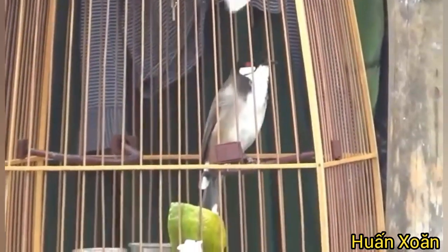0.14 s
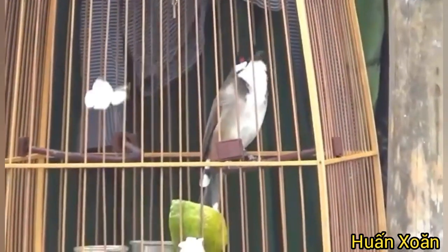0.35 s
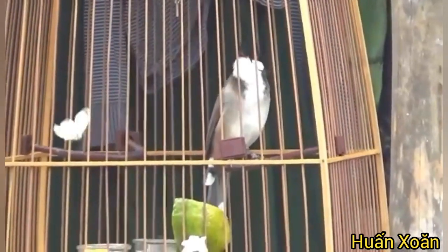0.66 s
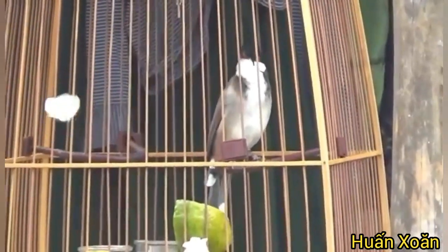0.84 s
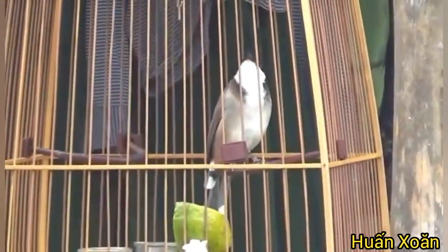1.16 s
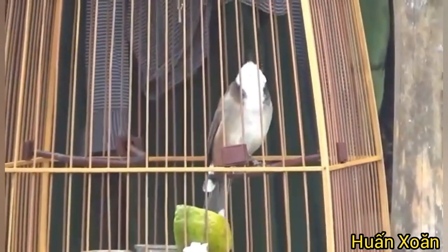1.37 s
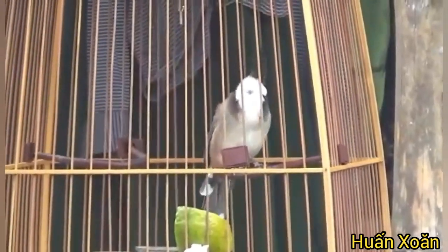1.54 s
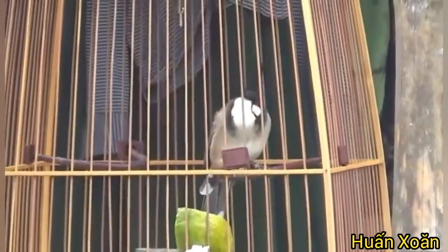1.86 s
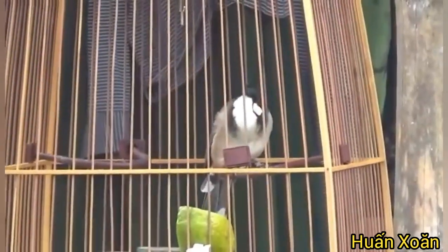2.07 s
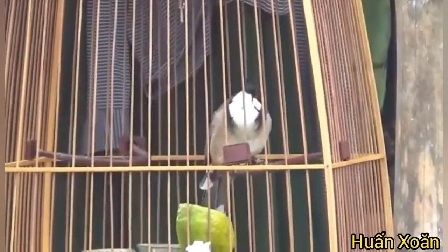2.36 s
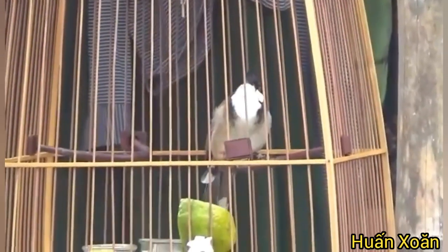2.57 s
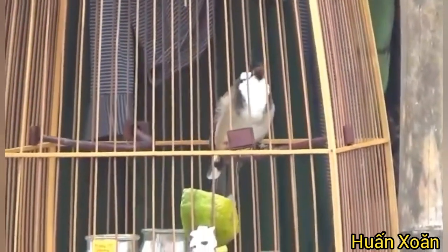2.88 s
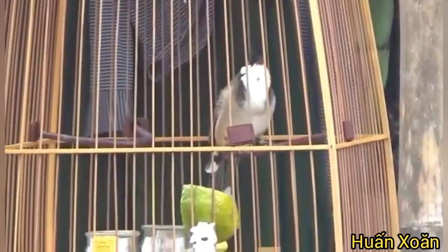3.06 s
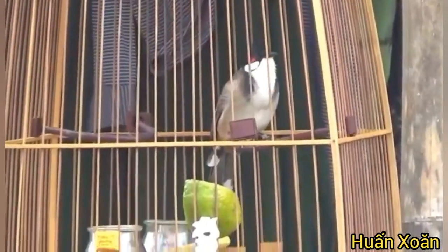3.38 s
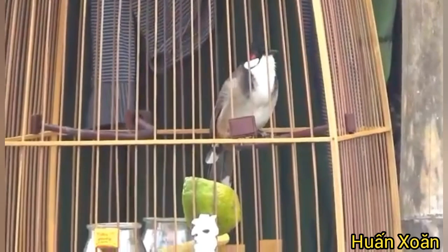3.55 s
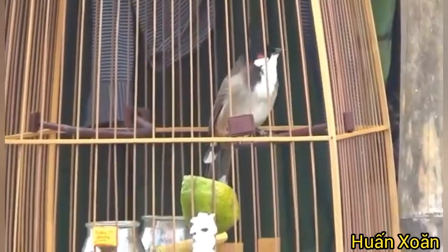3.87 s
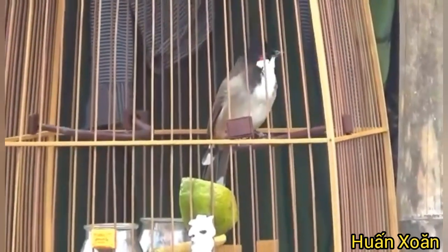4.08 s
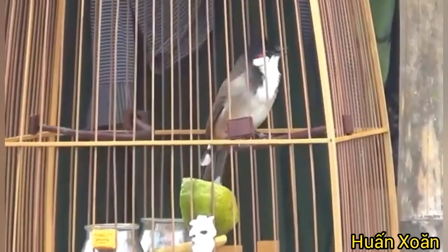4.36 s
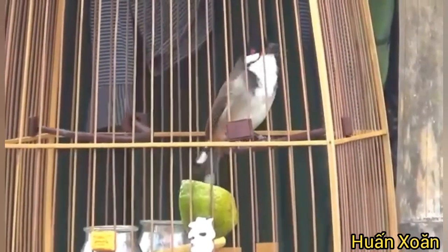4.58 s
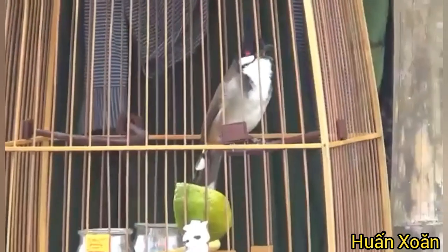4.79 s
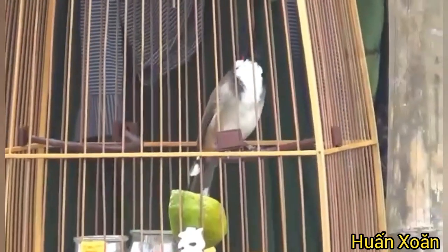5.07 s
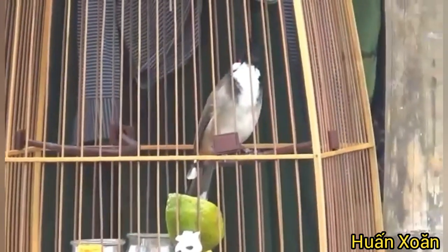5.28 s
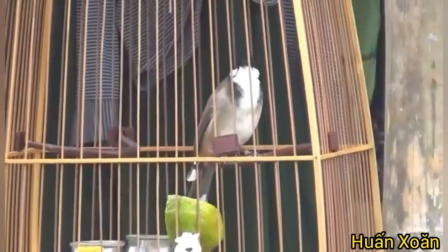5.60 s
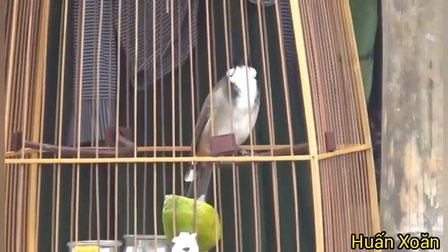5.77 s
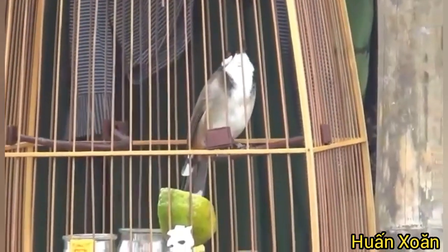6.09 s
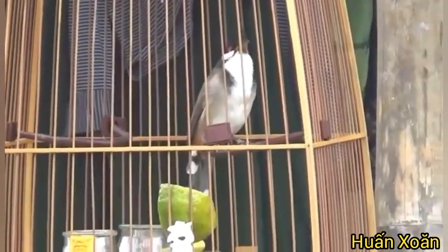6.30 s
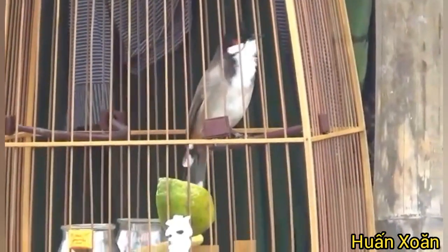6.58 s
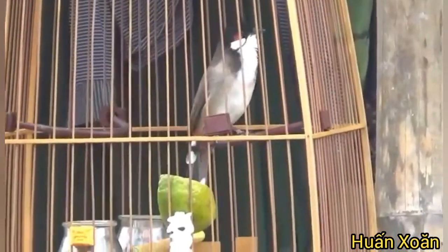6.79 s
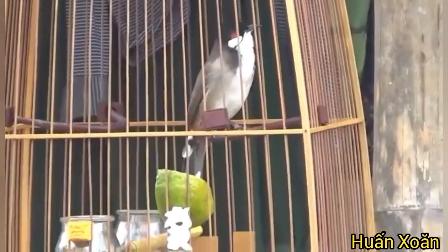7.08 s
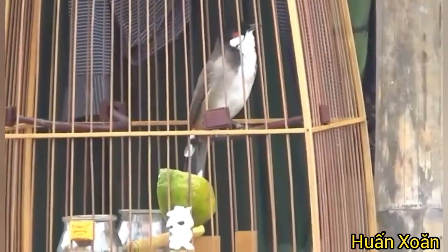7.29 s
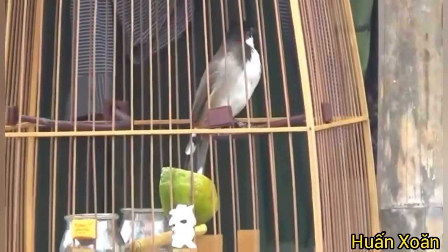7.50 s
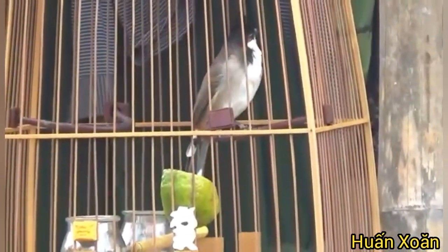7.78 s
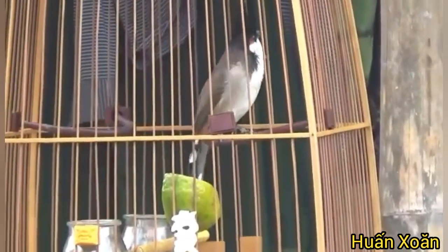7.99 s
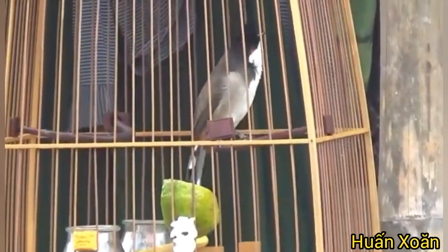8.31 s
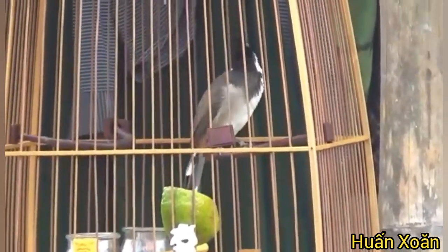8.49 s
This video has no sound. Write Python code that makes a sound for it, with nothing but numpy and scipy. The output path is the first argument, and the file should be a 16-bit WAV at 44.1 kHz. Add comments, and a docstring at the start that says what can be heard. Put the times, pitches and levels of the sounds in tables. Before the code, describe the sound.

A caged bird repeats quick, chattering whistled phrases in a quiet yard, while another bird chirps farther off.

```python
"""A caged bulbul sings six short phrases in a yard: rising whips, harsh buzzes, runs of gliding whistles.
Its syrinx gives a near sine, roughened by fast trills; the beak colours the overtones, and their
strength follows the turning head. Walls throw the notes back. Farther off a second bird chirps,
an insect buzzes in swells, and an engine hums for a while over low rumble and quiet outdoor air."""
import sys
import numpy as np
from scipy import signal
from scipy.fft import rfft, irfft, next_fast_len
from scipy.io import wavfile

SR = 44100
rng = np.random.default_rng(int(sys.argv[2]) if len(sys.argv) > 2 else 0)


def file_out(sig):
    """Save sig as 16-bit WAV at sys.argv[1]."""
    # one column per channel
    cols = np.atleast_2d(sig).T
    # limit, then scale
    lim = np.clip(cols, -1, 1)
    pcm = np.round(lim * 32767).astype(np.int16)
    wavfile.write(sys.argv[1], SR, pcm)


N = 381465
TIME_S = np.arange(N) / SR


def gain_of(db):
    """Decibels to gain."""
    return 10 ** (np.asarray(db) / 20)


def gain_curve(points):
    """Gain over the scene from (t/s, level/dB) points."""
    return gain_of(np.interp(TIME_S, *np.transpose(points)))


def unit_rms(x):
    """Scales to rms 1."""
    return x / np.sqrt(np.mean(x ** 2) + 1e-20)


def at_hz(points, hz):
    """Table lookup on a log-frequency axis."""
    table_hz, value = np.transpose(points)
    return np.interp(np.log(hz + 1), np.log(table_hz + 1), value)


def add(mix, start_s, sound):
    """Mixes a sound in at start_s."""
    at = round(start_s * SR)
    sound = sound[max(-at, 0):]
    part = mix[max(at, 0):][:len(sound)]
    part += sound[:len(part)]


def wander(size, rate_hz):
    """Smooth random drift, rms about 1."""
    padded = next_fast_len(size + SR // 2)
    hz = np.fft.rfftfreq(padded, 1 / SR)
    spectrum = rfft(rng.standard_normal(padded)) * np.exp(-(hz / rate_hz) ** 2)
    return unit_rms(irfft(spectrum, padded))[:size]


def fade(size, edge_s=0.002):
    """Window with cosine ends."""
    return signal.windows.tukey(size, min(1, 2 * edge_s * SR / size))


# air spectrum: f/Hz, relative density/dB
AIR_SPECTRUM_DB = [(15, -33), (30, -33), (90, -3.5), (200, -6), (330, -6.5), (600, -8.5), (850, -8),
                   (1250, -12), (1850, -13), (3700, -17.5), (6400, -20.5), (9400, -20), (11000, -25)]
# air loudness: t/s, level/dB
AIR_LEVEL_DB = [(0, -62.5), (1.5, -60.5), (2.3, -61), (4.5, -61.5), (6, -62), (8.65, -62)]
# likeness of left and right: f/Hz, correlation
AIR_CORRELATION = [(50, 0.92), (120, 0.94), (250, 0.67), (500, 0.23), (1000, 0.021), (3000, 0.21),
                   (10000, 0.77)]

def air():
    """Soft outdoor noise, centred in the bass, widest near 1 kHz."""
    hz = np.fft.rfftfreq(N, 1 / SR)
    left, independent = rfft(rng.standard_normal((2, N)))
    correlation = at_hz(AIR_CORRELATION, hz)
    right = correlation * left + np.sqrt(1 - correlation ** 2) * independent
    spectra = np.array([left, right]) * gain_of(at_hz(AIR_SPECTRUM_DB, hz))
    return unit_rms(irfft(spectra, N)) * gain_curve(AIR_LEVEL_DB)


# deep outdoor rumble: t/s, level/dB
RUMBLE_LEVEL_DB = [(0, -77), (.6, -64.5), (1.1, -75), (2, -73), (2.8, -76), (3.7, -79), (4.9, -71.5),
                   (5.3, -68.5), (6, -76), (7.2, -82), (8.65, -83)]
# faint hum: t/s, level/dB
HUM_LEVEL_DB = [(0, -74), (1.2, -83), (1.55, -67.5), (1.899, -85), (2.6, -84), (3, -71.5), (3.4, -94),
                (4.15, -88), (4.4, -70.5), (4.75, -71), (5, -87), (8.65, -98)]

def rumble(centre_hz=53, width_hz=16, hum_hz=135.4, hum_drift_hz=5):
    """Narrow-band rumble and a wavering hum; both come and go."""
    deep = wander(N, width_hz) * np.sin(2 * np.pi * centre_hz * TIME_S)
    hum = np.sin(2 * np.pi * np.cumsum(hum_hz + hum_drift_hz * wander(N, 12.55)) / SR)
    return unit_rms(deep) * gain_curve(RUMBLE_LEVEL_DB) + unit_rms(hum) * gain_curve(HUM_LEVEL_DB)


# engine loudness: t/s, level/dB
ENGINE_LEVEL_DB = [(0, -71), (.4, -68), (.8, -63), (1.55, -61.5), (1.95, -72.5), (2.4, -81), (3, -72),
                   (3.8, -78), (5.5, -77), (8.65, -95)]
# base rate and its orders: multiple, relative level/dB
ENGINE_HZ, ORDERS_DB = 28.5, [(2, -7.5), (3, 1.5), (4, -24), (5, -9), (6, -14)]

def engine(drift=0.015, flutter_db=4.5):
    """Low orders of a distant engine, each wavering in strength."""
    phase = 2 * np.pi * np.cumsum(ENGINE_HZ * (1 + drift * wander(N, 4.4))) / SR
    hum = sum(gain_of(db + flutter_db * wander(N, 14)) * np.sin(k * phase) for k, db in ORDERS_DB)
    return unit_rms(hum) * gain_curve(ENGINE_LEVEL_DB)


# yard decay: f/Hz, T60/s
YARD_T60_S = [(1500, 0.61), (3500, 0.43), (7000, 0.2), (11000, 0.27)]

def yard(x, crossfeed=0.43, build_s=0.0066):
    """Diffuse tail from walls and eaves; builds after the direct sound, treble dies first."""
    noise = rng.standard_normal((2, SR))
    hz, t, spectra = signal.stft(noise + crossfeed * noise[::-1], SR, nperseg=256)
    decay = gain_of(-60 * t / at_hz(YARD_T60_S, hz)[:, None])
    build = 1 - np.exp(-(t / build_s) ** 2)
    tail = signal.istft(spectra * decay * build, SR, nperseg=256)[1]
    return signal.fftconvolve(x[None], tail / np.linalg.norm(tail[0]), axes=1)[:, :N]


# reflections: delay/s, left gain, right gain
NEAR_ECHOES = [(.0023, 0.19, 0.3), (.0061, -0.27, -0.21), (0.0135, 0.29, 0.25), (0.025, .07, .05),
               (.041, 0.036, 0.042)]

def near_echoes(x):
    """Direct sound plus single reflections from close surfaces."""
    out = np.array([x, x])
    for delay_s, left, right in NEAR_ECHOES:
        add(out[0], delay_s, left * x)
        add(out[1], delay_s, right * x)
    return out


# buzz swells: start/s, end/s, final level/dB
INSECT_SWELLS = [(0.157, 0.856, -67.5), (1.954, 2.318, -66), (3.497, 3.95, -68.5), (5.1, 5.55, -68.5),
                 (6.5, 7.055, -67.5), (8.15, 8.543, -69)]

def insect(centre_hz=7150, spread_hz=170, rise_db=12, stroke_hz=130):
    """Regular strokes ring a narrow, unsteady tone; each swell stops short."""
    envelope = np.zeros(N)
    for start_s, end_s, db in INSECT_SWELLS:
        remaining = np.linspace(1, 0, round((end_s - start_s) * SR))
        swell = gain_of(db - rise_db * remaining ** 2)
        add(envelope, start_s, swell * fade(len(swell), edge_s=0.01))
    tone = np.sin(2 * np.pi * np.cumsum(centre_hz + spread_hz * wander(N, 295)) / SR)
    strokes = 1 + np.sin(2 * np.pi * stroke_hz * TIME_S)
    return envelope * unit_rms(tone * strokes)


# open-beak response: f/Hz, gain/dB
BEAK_GAIN_DB = [(4500, -6.5), (6000, -24.5), (7200, -9), (8200, -32), (9000, -5.5), (9700, -10),
                (10500, -1), (11500, 0.5)]

def syrinx(hz, db, loud_db=-28):
    """Near sine; overtones, chiefly the third, grow with effort and are coloured by the beak."""
    phase = 2 * np.pi * np.cumsum(hz) / SR
    effort_db = np.minimum(db - loud_db, 2)
    second = gain_of(-22 + 0.043 * effort_db + at_hz(BEAK_GAIN_DB, 2 * hz)) * np.sin(2 * phase)
    third = gain_of(-10 + 0.61 * effort_db + at_hz(BEAK_GAIN_DB, 3 * hz)) * np.sin(3 * phase)
    return np.sqrt(2) * gain_of(db) * (np.sin(phase) + second + third) * fade(len(hz))


# far bird's calls: t/s, level/dB, f/Hz
FAR_CHIRPS = [(-.09, -46, 3860), (0.77, -46.5, 3770), (1.808, -45.5, 3664), (2.444, -46.5, 3660),
              (3.341, -46, 3810), (4.079, -48.5, 3910), (4.83, -50, 3810), (5.538, -49.5, 3890),
              (6.45, -51.5, 3880), (6.723, -48.5, 3956), (7.549, -50, 3950), (8.303, -48, 3720)]
# one chirp: t/s, pitch ratio, relative level/dB
CHIRP_CONTOUR = [(0, .895, -6), (.015, .95, -1.5), (.04, 1, 0), (.07, 1.015, -1), (.095, 1.005, -12)]

def far_bird(jitter=0.0337):
    """Repeated rising chirp, hoarse from fast pitch jitter."""
    out = np.zeros(N)
    knots_s, glide, contour_db = np.transpose(CHIRP_CONTOUR)
    t = np.arange(0, knots_s[-1], 1 / SR)
    for start_s, db, hz in FAR_CHIRPS:
        pitch_hz = hz * np.interp(t, knots_s, glide) * (1 + jitter * wander(len(t), 460))
        add(out, start_s, syrinx(pitch_hz, db + np.interp(t, knots_s, contour_db)))
    return out


def rasp(db, highpass_hz=4300, beak_share=0.05):
    """Turbulent hiss leaving the beak with a rough note."""
    size = len(db)
    hz = np.fft.rfftfreq(size, 1 / SR)
    colour = gain_of(at_hz(BEAK_GAIN_DB, hz) * beak_share) / (1 + (highpass_hz / (hz + 1)) ** 4)
    hiss = irfft(rfft(rng.standard_normal(size)) * colour, size)
    return gain_of(db) * unit_rms(hiss) * fade(size)


def flick(from_hz, to_hz, db, length_s=0.01177, jitter=0.088, shimmer_db=3, rasp_db=-19):
    """Unsteady upward sweep as the voice catches."""
    u = np.linspace(0, 1, round(length_s * SR))
    hz = (from_hz + (to_hz - from_hz) * u) * (1 + jitter * wander(len(u), 1030))
    level_db = db - 7 - 28 * (u - .75) ** 2 + shimmer_db * wander(len(u), 910)
    return syrinx(hz, level_db) + rasp(level_db + rasp_db)


def crest_db(u, top, rise_db, fall_db):
    """Level over a note (u = 0..1): swells to 0 dB at u = top, then falls."""
    return -np.where(u < top, rise_db * (1 - u / top) ** 2, fall_db * ((u - top) / (1 - top)) ** 2)


def voice(hz, db, trill, trill_hz=185.1, swing_hz=303, throb_db=2, shimmer_db=0.5, rasp_db=-21):
    """Sung tone; in a trill the pitch jumps up and slides down, loudest on the way down."""
    size, trill = len(hz), np.clip(trill, 0, 1)
    cycle = 2 * np.pi * np.cumsum(trill_hz * (1 + 0.044 * wander(size, 60))) / SR
    hz = hz + trill * swing_hz * (np.sin(cycle) + 0.18 * np.sin(2 * cycle))
    jitter = .002 + .015 * trill
    hz = hz * (1 + jitter * wander(size, 450))
    db = db + trill * (throb_db * np.sin(cycle - 1) - 5) + shimmer_db * wander(size, 170)
    return syrinx(hz, db) + trill * rasp(db + rasp_db)


def whip(length_s, from_hz, to_hz, db, trill, jitter=0.02, shimmer_db=3, flutter_hz=254):
    """Rough upward sweep that levels off and thins out near its top."""
    u = np.linspace(0, 1, round(length_s * SR))
    sweep_hz = to_hz + (from_hz - to_hz) * (1 - u) ** 1.7
    hz = sweep_hz * (1 + jitter * wander(len(u), flutter_hz))
    level_db = db + crest_db(u, top=0.38, rise_db=8, fall_db=24)
    return voice(hz, level_db + shimmer_db * wander(len(u), flutter_hz), trill)


def buzz(length_s, hz, db, trill, scoop_hz=498, scoop_s=0.0082, catch_s=0.013):
    """Deep trill that scoops up to a steady pitch, swells and stops short."""
    t = np.arange(0, length_s, 1 / SR)
    pitch_hz = hz - scoop_hz * np.exp(-t / scoop_s)
    level_db = db + crest_db(t / length_s, top=0.64, rise_db=4.5, fall_db=2.5)
    catch = 0.67 * np.exp(-t / catch_s)
    return voice(pitch_hz, level_db, trill + catch)


def whistle(length_s, from_hz, to_hz, db, swell_db, trill, arch_db=4.5, settle_s=0.0032, catch_s=0.0036):
    """Lands from above with a brief trill, then glides evenly under an arch of loudness."""
    t = np.arange(0, length_s, 1 / SR)
    u = t / length_s
    overshoot = 0.041 * np.exp(-t / settle_s)
    hz = (from_hz + (to_hz - from_hz) * u) * (1 + overshoot)
    level_db = db + swell_db * (u - .5) - arch_db * ((2 * u - 1) ** 2 - .25)
    catch = 0.31 * np.exp(-t / catch_s)
    return voice(hz, level_db, trill + catch)


# treble as the head turns: t/s, gain/dB
FACING_GAIN_DB = [(.5, 1.5), (1.3, -1), (2.55, 2), (2.8, 5), (4.5, 3), (5, 1), (6.1, 2.5), (6.5, 6.5),
                  (8, 1)]

def turning_head(song, split_hz=5200):
    """Overtones beam forward, so their strength changes as the bird looks about."""
    highpass = signal.butter(4, split_hz, btype="high", fs=SR, output="sos")
    treble = signal.sosfiltfilt(highpass, song)
    return song + treble * (gain_curve(FACING_GAIN_DB) - 1)


# rising whips: t/s, length/s, from f/Hz, to f/Hz, level/dB, trill depth
WHIP_NOTES = [(0.393, 0.043, 3090, 4390, -35.5, 0.63), (6.067, 0.042, 3050, 4480, -35, 0.32),
              (6.247, .049, 2462, 3970, -32.5, 0.35), (7.968, 0.056, 3220, 4250, -39, 0.44)]
# paired buzzes: t/s, length/s, f/Hz, level/dB, trill depth
BUZZ_NOTES = [(2.496, 0.054, 3328, -30.5, 0.65), (2.717, 0.058, 3350, -27.5, 0.66),
              (4.489, 0.055, 3477, -30.5, 0.47), (4.684, 0.064, 3426, -27, 0.57)]
# two flicks before each whip and buzz: lead/s, from f/Hz, to f/Hz, level/dB
LEAD_FLICKS = [(.0175, 2380, 3650, -42.5), (0.0083, 1700, 3450, -42)]
# whistles: t/s, length/s, from f/Hz, to f/Hz, level/dB, start-to-end swell/dB, trill depth
WHISTLE_NOTES = [ (0.602, 0.026, 3680, 3600, -42, 19, 0), (.632, 0.052, 3173, 3054, -36.5, -3.5, 0.18),
                 (0.698, 0.022, 2366, 2484, -41, -2, 0.3), (1.292, 0.02, 3382, 3440, -33, 7, 0),
                 (1.312, 0.015, 3230, 3450, -33.5, -3, 0.32), (1.341, .019, 2900, 2466, -41, -9, 0.7),
                 (1.508, 0.019, 2250, 2006, -48.5, 8, 0.32), (1.521, 0.031, 2260, 2450, -42, -1, 0.4),
                 (1.557, 0.013, 3050, 2800, -39, 0, 0.3), (1.663, 0.019, 2240, 1956, -47, 10, 0.3),
                 (1.682, 0.032, 2200, 2520, -42.5, -6, .4), (1.713, 0.0125, 3100, 2900, -41, 7, 0.64),
                 (2.909, 0.014, 2570, 2440, -40, -12, .3), (2.923, 0.055, 3036, 2868, -36, 4, 0),
                 (2.970, 0.0167, 2867, 2760, -28.5, 6, 0.11), (2.991, 0.037, 3576, 3395, -31.5, 5.5, 0.2),
                 (3.049, 0.061, 2494, 2604, -40.5, 1, 0.15), (3.112, 0.032, 2180, 2346, -44, 1, 0.33),
                 (4.877, 0.017, 2630, 2390, -39, -6, 0.63), (4.891, 0.073, 2980, 2822, -34.5, 5, 0.22),
                 (4.961, .034, 3643, 3390, -32, 3.5, 0.15), (5.016, 0.063, 2480, 2630, -44.5, -4, 0.14),
                 (5.078, 0.044, 2288, 2372, -44.5, -10, 0.3), (6.379, 0.032, 3440, 3333, -36, 4.5, .04),
                 (6.418, .021, 3266, 3186, -41, 13, 0.2), (6.438, 0.024, 2857, 2770, -32, -2, 0),
                 (6.540, .015, 2040, 1920, -40, -1, 0.06), (6.557, 0.032, 2070, 2310, -44, -10, 0.64),
                 (6.658, 0.011, 2660, 2880, -44, 1, .7), (6.674, 0.011, 3140, 2750, -38, 0, 0.7),
                 (6.738, 0.029, 2030, 1940, -41.5, 4, 0), (6.762, .027, 1590, 1555, -52, 9, 0.02),
                 (6.790, 0.022, 1955, 2060, -42.5, 2, 0.13), (6.814, 0.017, 2704, 2400, -41, 0, 0.66),
                 (8.186, 0.022, 3780, 3640, -51, 6, 0), (8.209, .030, 3350, 3220, -37, -4, 0.28),
                 (8.24, 0.027, 3170, 3100, -37, -5, 0.04), (8.276, 0.028, 2483, 2450, -40.5, 7, 0.32), ]
# flicks opening whistle runs: t/s, top f/Hz, level/dB
RUN_FLICKS = [(0.587, 3060, -45.5), (1.281, 3440, -38), (2.902, 3160, -36), (4.871, 3100, -38.5),
              (6.37, 3260, -39.5), (6.532, 2370, -43), (6.650, 2850, -44), (6.729, 2180, -49),
              (8.169, 3150, -46)]

def bulbul(flick_foot_ratio=.66):
    """Six phrases of whips, buzzes and whistle runs, led in by upward flicks."""
    song = np.zeros(N)
    for note, rows in [(whip, WHIP_NOTES), (buzz, BUZZ_NOTES)]:
        for start_s, *shape in rows:
            add(song, start_s, note(*shape))
            for lead_s, *sweep in LEAD_FLICKS:
                add(song, start_s - lead_s, flick(*sweep))
    for start_s, *shape in WHISTLE_NOTES:
        add(song, start_s, whistle(*shape))
    for start_s, top_hz, db in RUN_FLICKS:
        add(song, start_s, flick(flick_foot_ratio * top_hz, top_hz, db))
    return song


def scene(song_wet_db=-12, far_dry_db=-5, far_wet_db=-10, far_pan_db=1.5):
    """Bulbul mostly dry; far bird and insect reverberant, slightly right."""
    song = turning_head(bulbul())
    far_calls = far_bird() + insect()
    near = near_echoes(song) + gain_of(song_wet_db) * yard(song)
    far = gain_of(far_dry_db) * far_calls + gain_of(far_wet_db) * yard(far_calls)
    pan = gain_of([[-far_pan_db], [far_pan_db]])
    return near + far * pan + engine() + rumble() + air()


def record(dry, cutoff_hz=11200):
    """Steep low-pass."""
    lowpass = signal.firwin(401, cutoff_hz, window=("kaiser", 9), fs=SR)
    return signal.oaconvolve(dry, lowpass[None], "same")


dry = scene()
out = record(dry)
file_out(out)
```